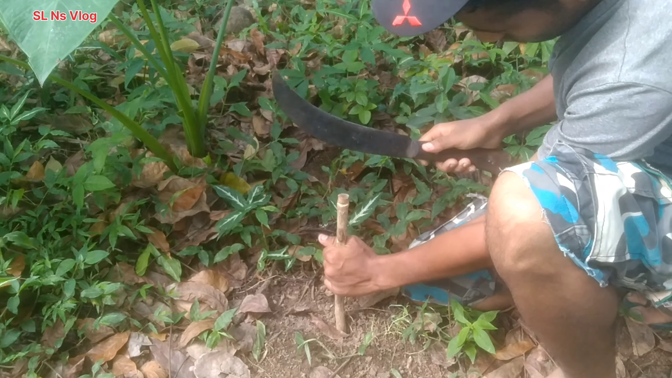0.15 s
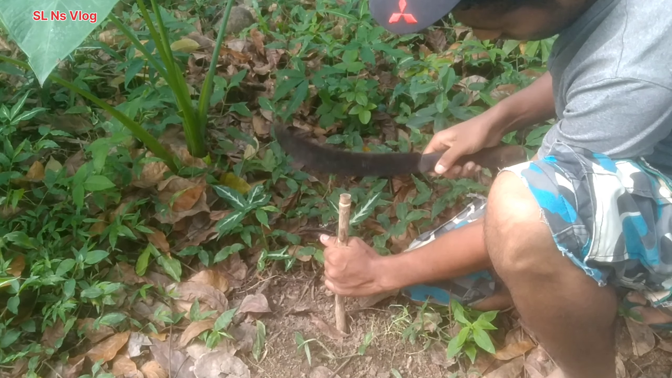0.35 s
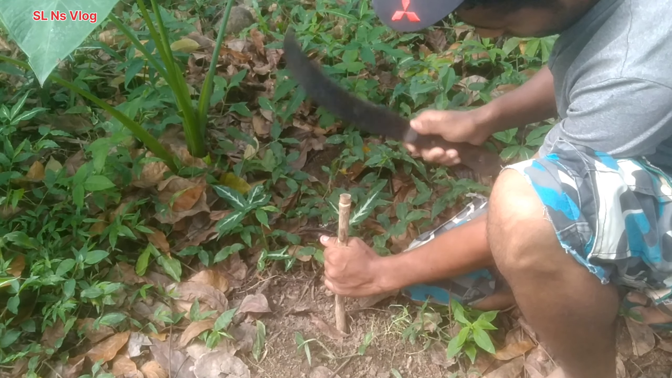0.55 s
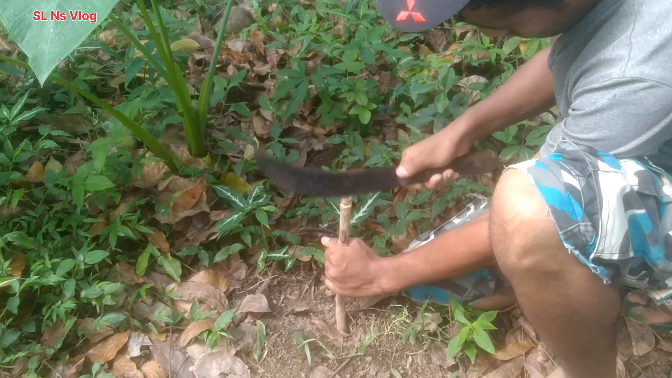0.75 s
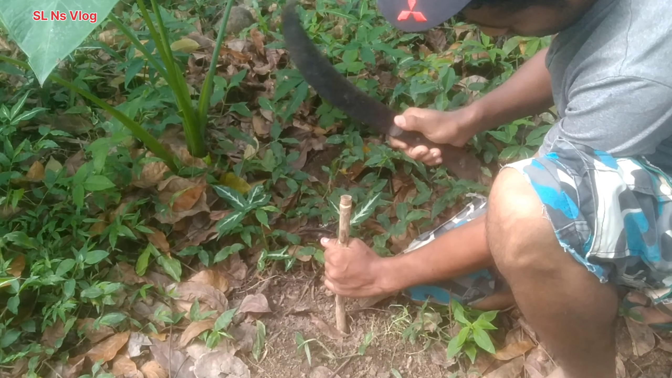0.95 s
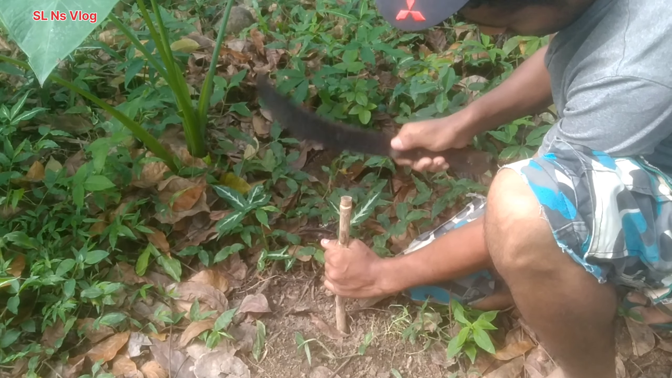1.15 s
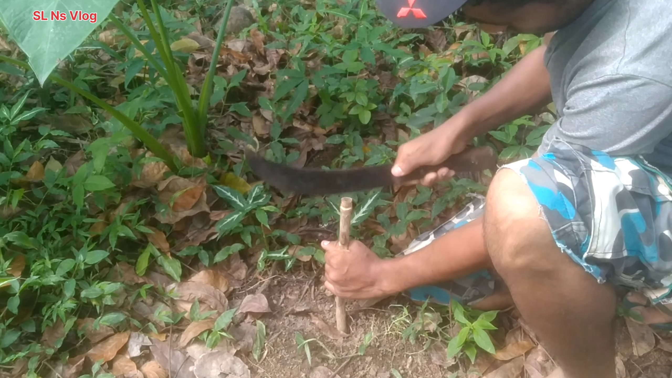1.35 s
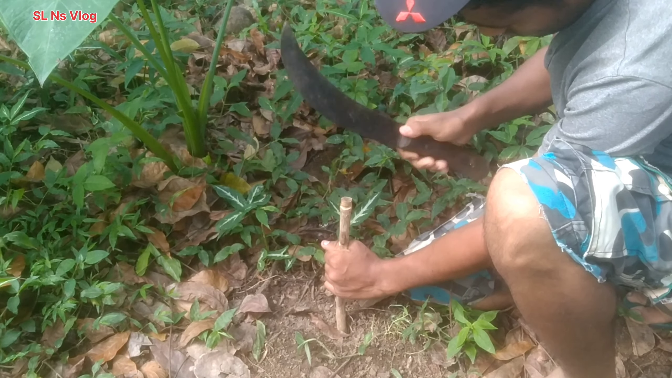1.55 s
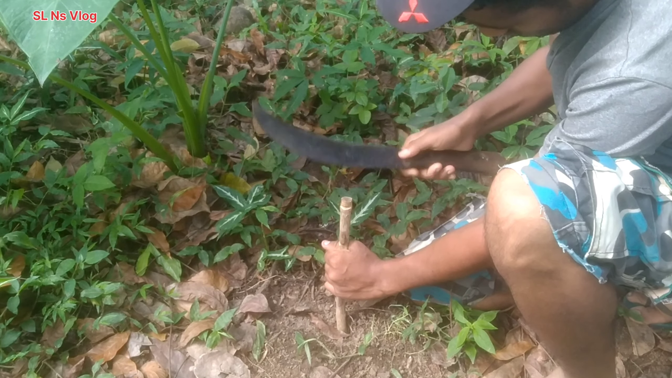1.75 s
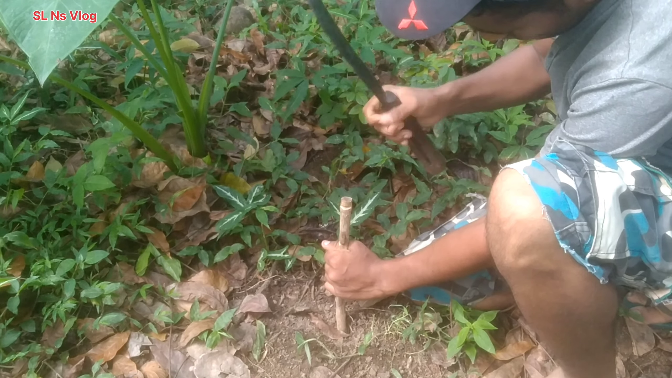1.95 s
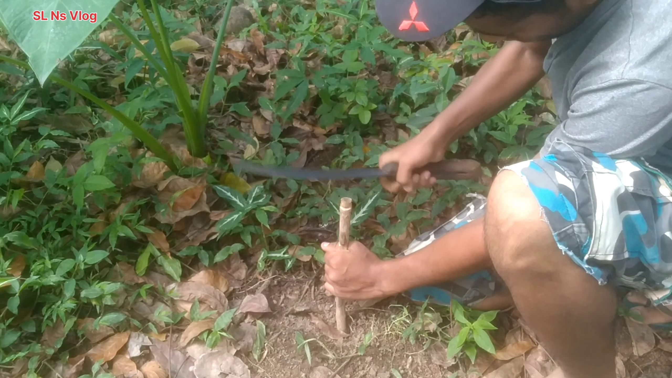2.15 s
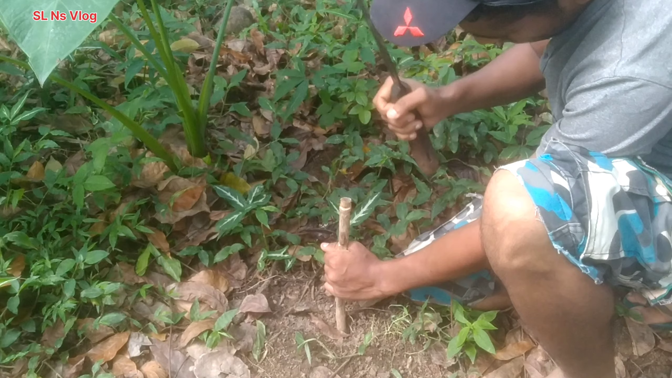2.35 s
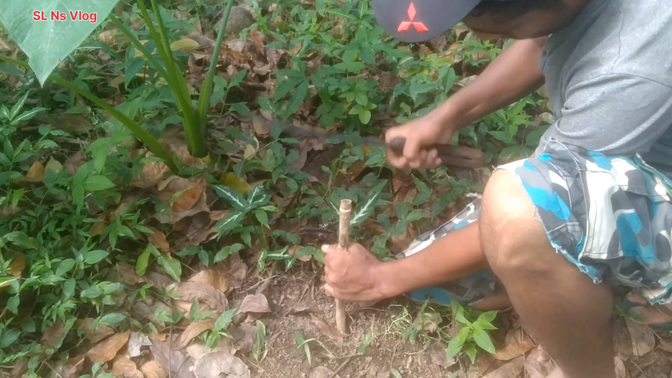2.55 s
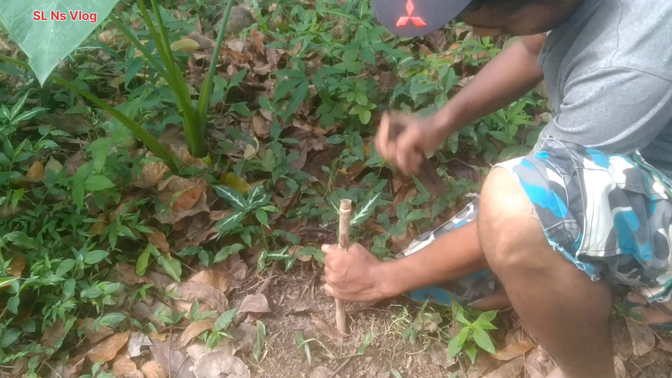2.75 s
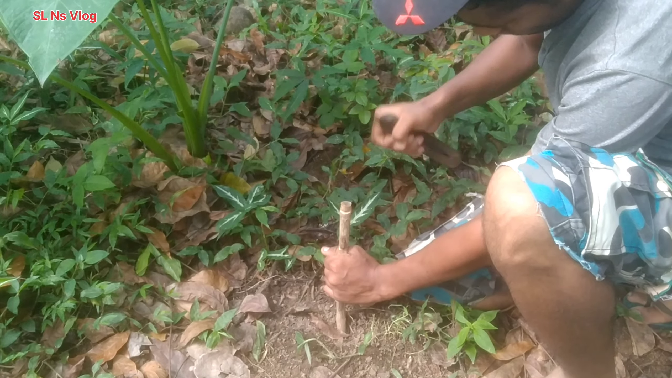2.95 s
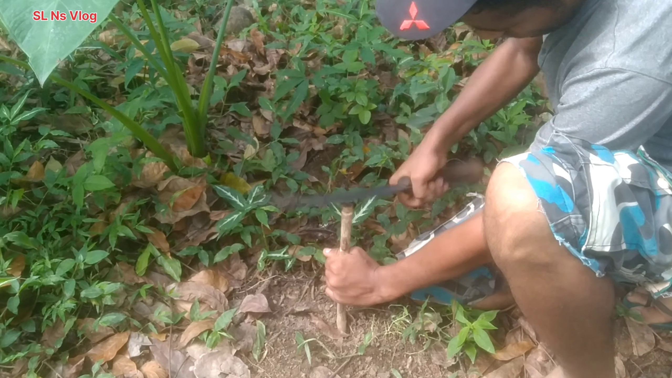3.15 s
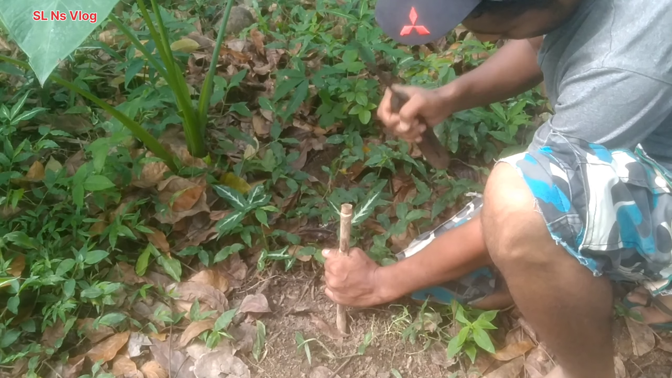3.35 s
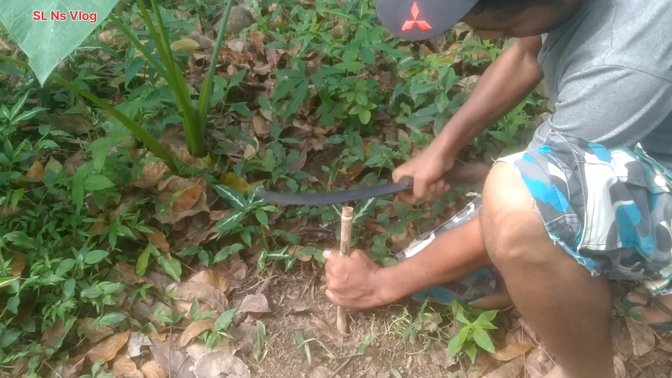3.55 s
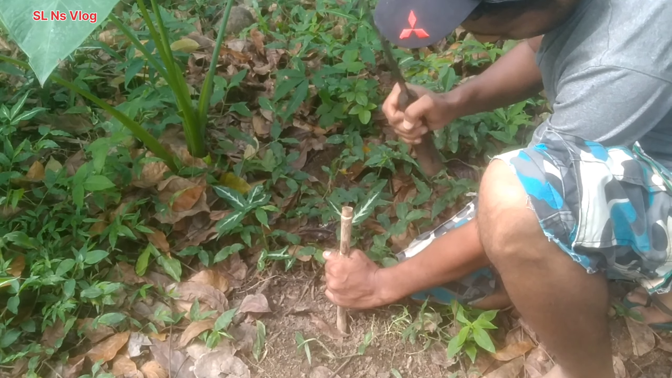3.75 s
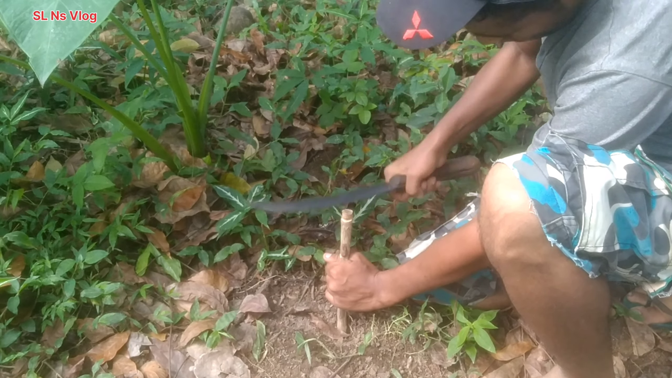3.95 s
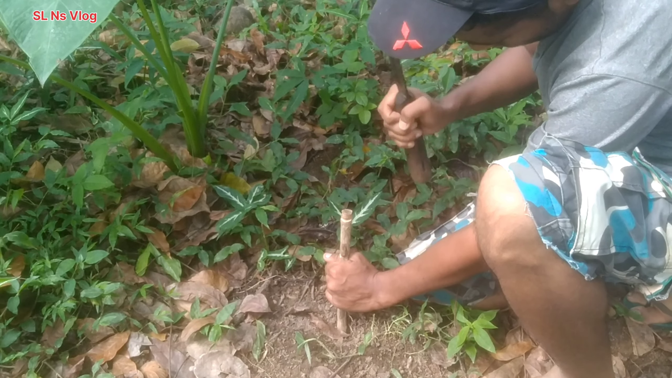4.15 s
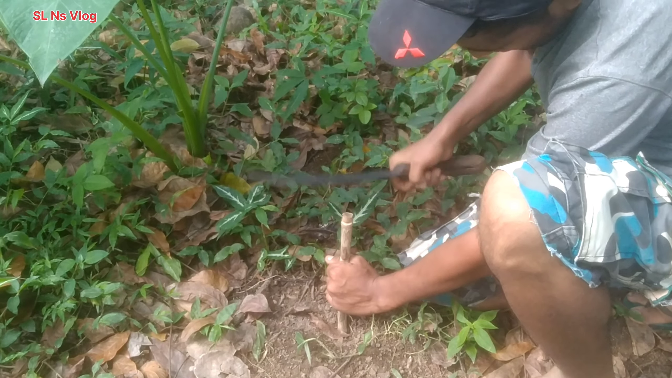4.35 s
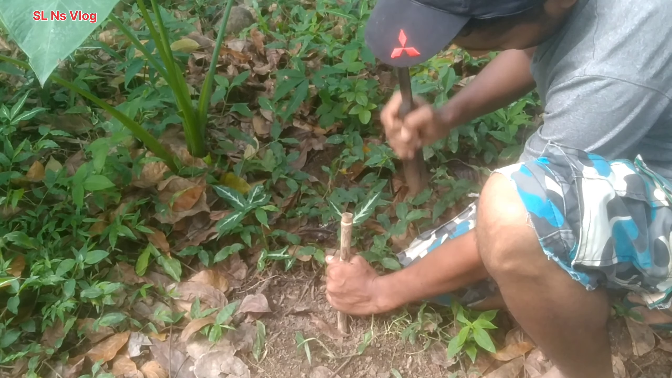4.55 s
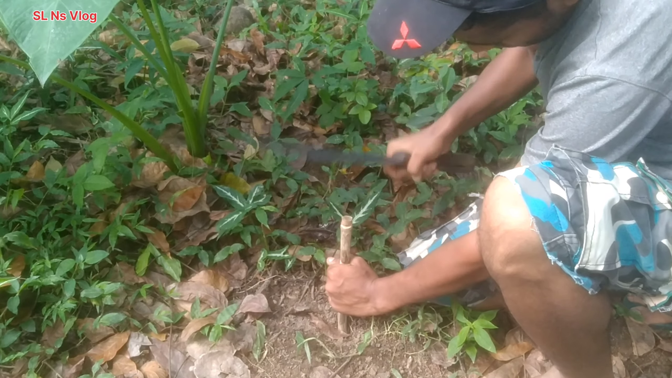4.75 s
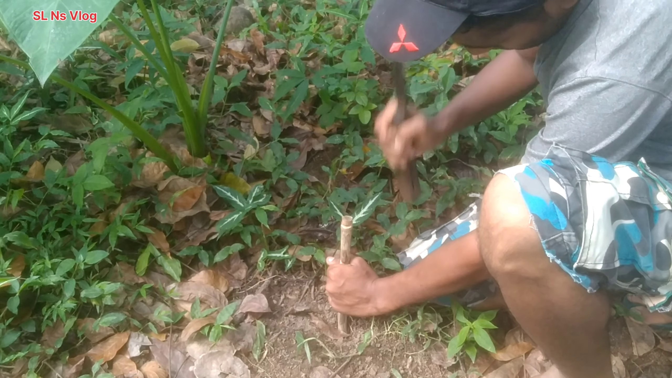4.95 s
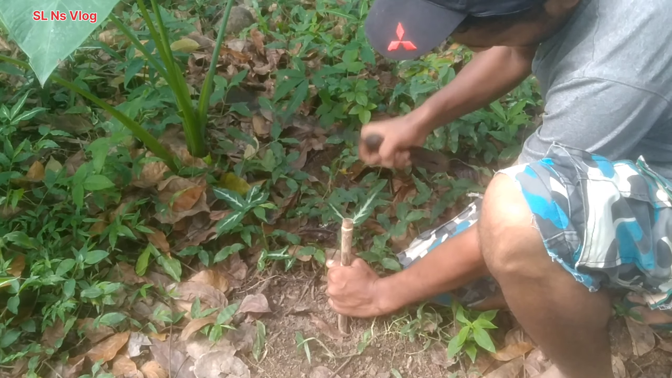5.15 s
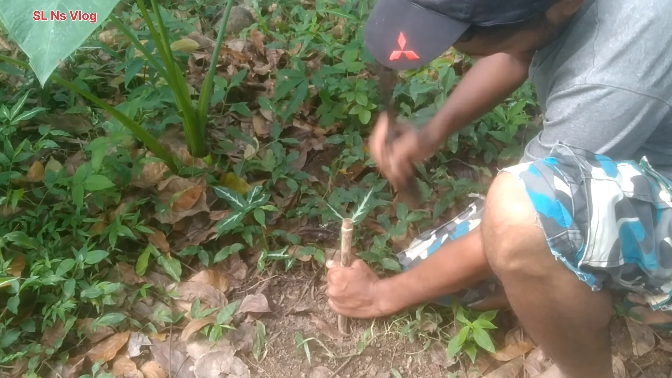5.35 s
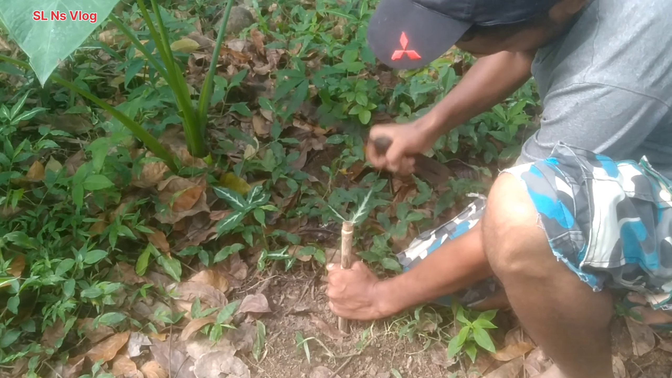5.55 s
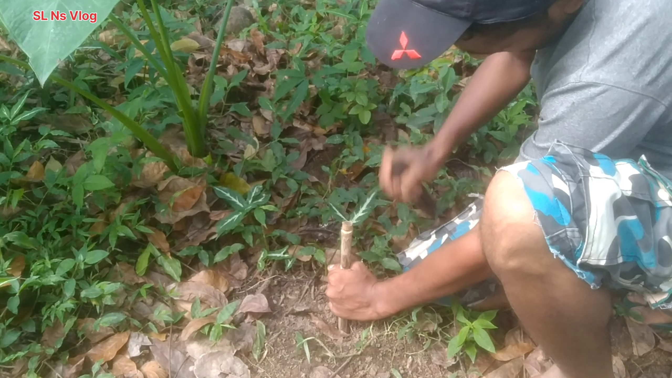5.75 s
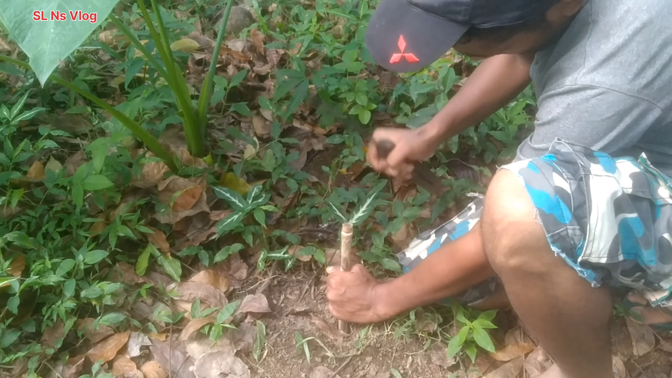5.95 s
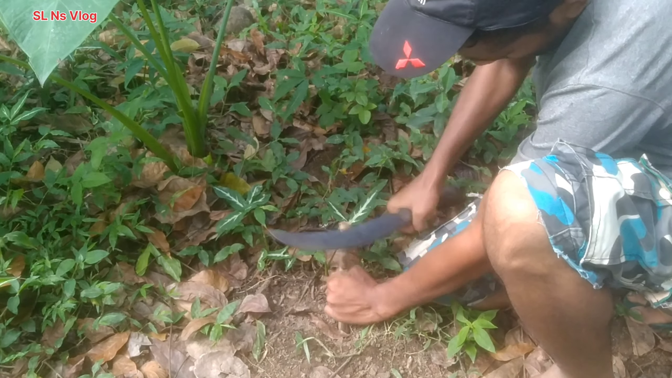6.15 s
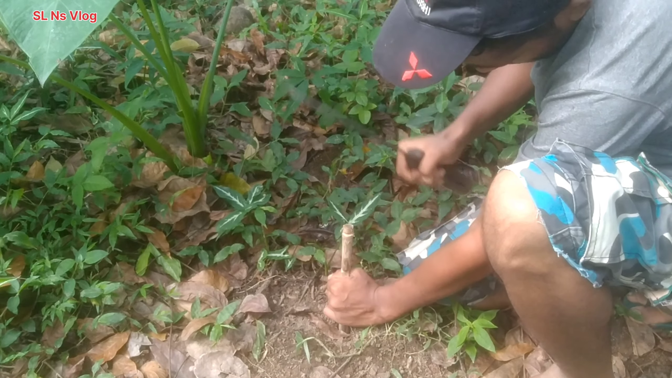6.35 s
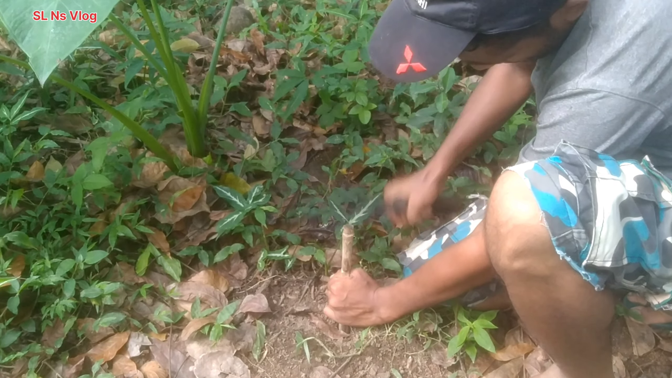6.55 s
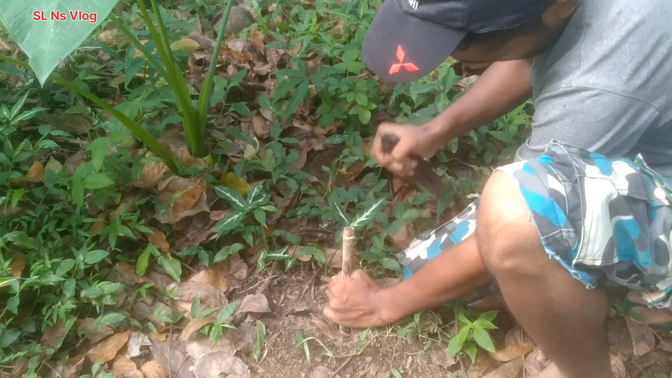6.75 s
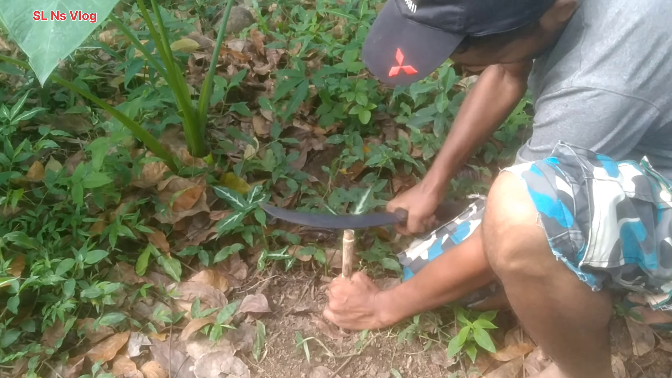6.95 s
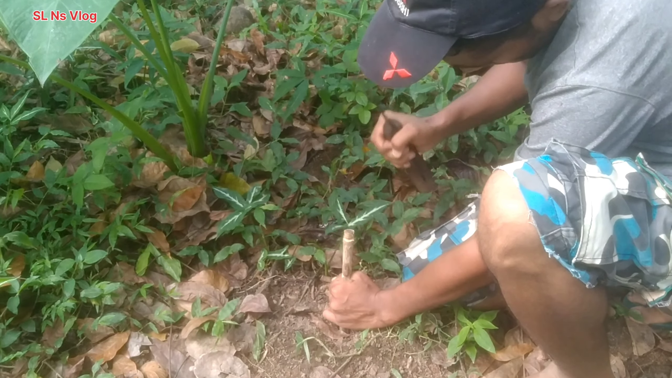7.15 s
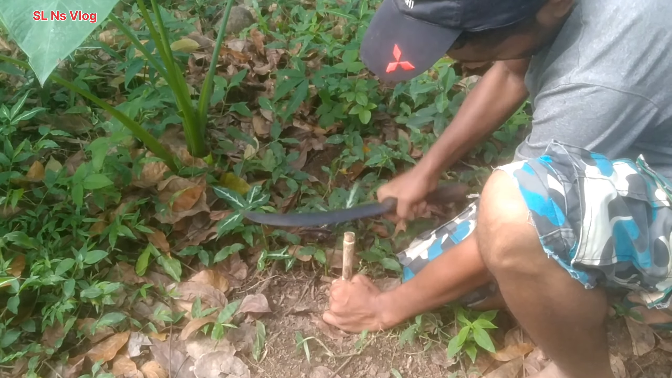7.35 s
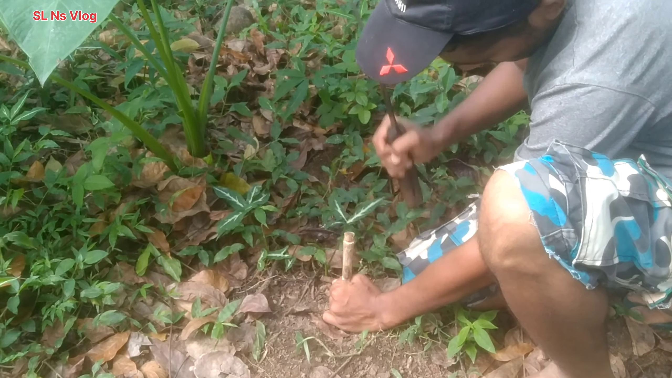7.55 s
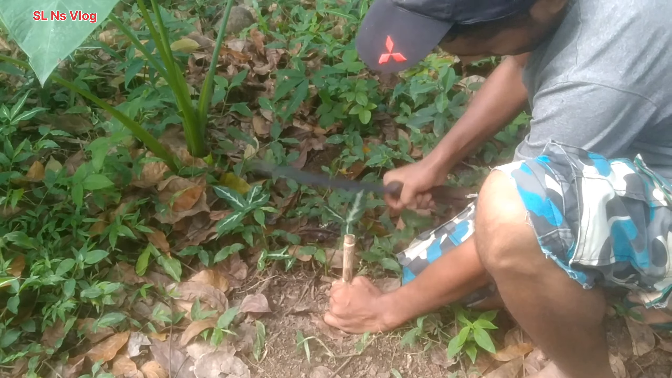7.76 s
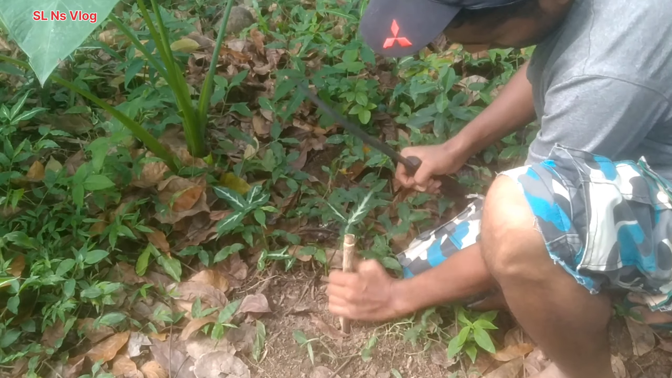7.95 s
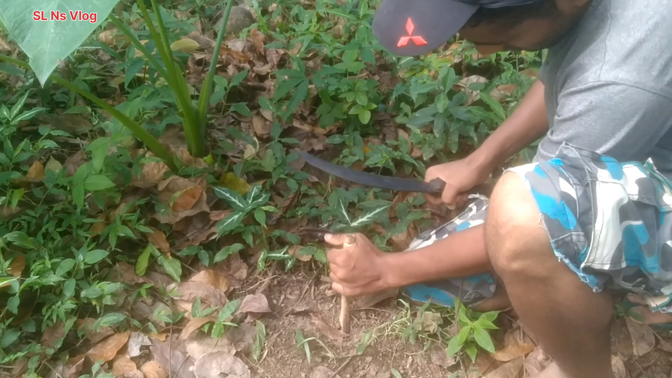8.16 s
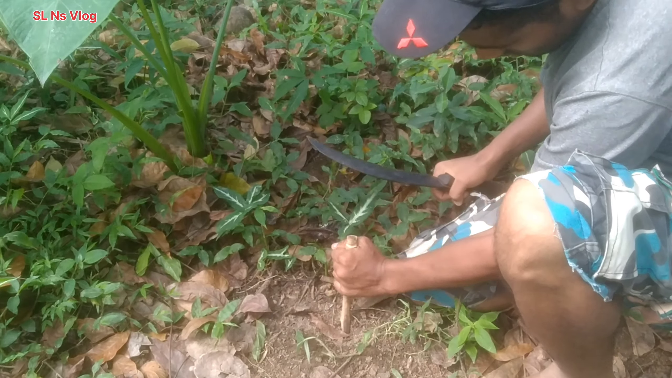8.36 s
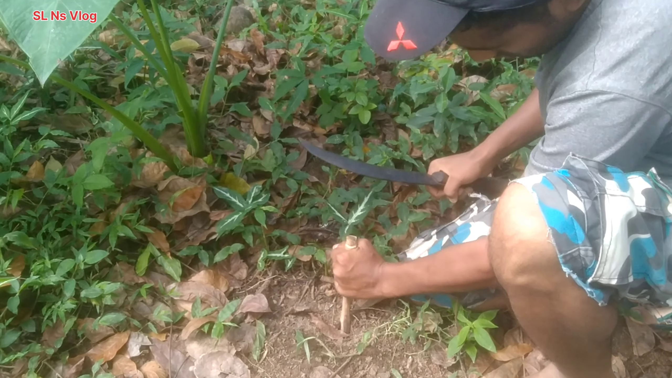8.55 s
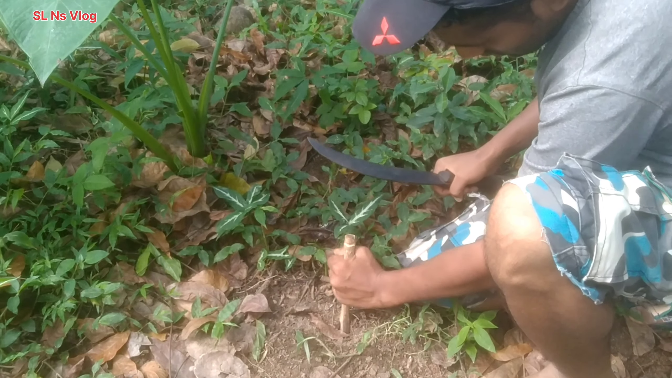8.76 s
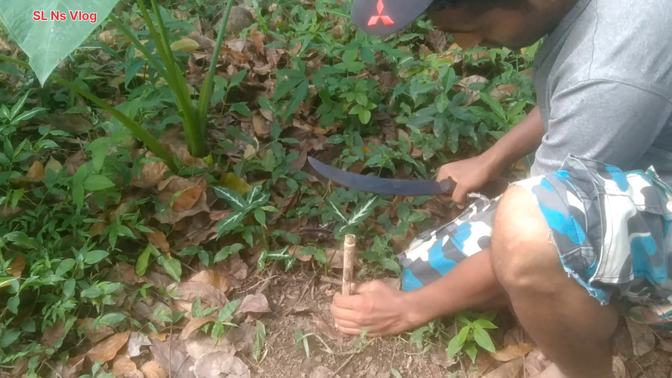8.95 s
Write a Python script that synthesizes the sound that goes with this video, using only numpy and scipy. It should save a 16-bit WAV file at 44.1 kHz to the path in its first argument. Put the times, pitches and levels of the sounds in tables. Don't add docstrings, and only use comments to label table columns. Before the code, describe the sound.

Three light machete taps on a thin wooden stake, then sixteen hard, sharp cracks driving it into soil, ringing among trees.

```python
import sys
import numpy as np
from scipy import signal
from scipy.fft import rfft, irfft
from scipy.io import wavfile
from scipy.ndimage import uniform_filter1d

SR = 44100
rng = np.random.default_rng(int(sys.argv[2]) if len(sys.argv) > 2 else 0)


def boost(x):
    u = np.asarray(x, float) / 20
    return 10 ** u


def wrap_up_sound(samples):
    columns = np.atleast_2d(samples).T
    tamed = np.clip(columns, -1, 1)
    steps = np.round(tamed * 32767).astype(np.int16)
    wavfile.write(sys.argv[1], SR, steps)


N = 400869

# start in seconds, peak in dB, scatter in dB, soil thud in dB.
TAPS = [
    (0.846, -25.5, -26, -42),
    (1.145, -31, -31.5, -37.5),
    (1.424, -28.5, -30, -39),
]
# landing in seconds, peak in dB, stake pitch in Hz, membrane push in dB, gain drop in dB.
BLOWS = [(2.1942, -24.5, 2310, -56, -1), (2.5565, -16, 2430, -45, 3.5), (2.8968, -13.5, 2430, -45, 4),
         (3.245, -16, 2515, -34, 8), (3.6042, -16, 2580, -43.5, 6), (3.971, -15.5, 2530, -44.5, 5.5),
         (4.3562, -16, 2710, -43.5, 8), (4.727, -14, 2710, -32, 11), (5.1124, -15.5, 2360, -41.5, 9),
         (5.497, -16, 2380, -34, 12.5), (5.8864, -17, 2440, -43, 8.5), (6.251, -13.5, 2500, -36.5, 8),
         (6.6652, -17.5, 2470, -48, 4.5), (7.0331, -15, 2390, -44, 7), (7.3863, -17.5, 2440, -42, 12.5),
         (7.7262, -16.5, 2410, -41, 6.5)]
# ring in dB, landing place along the blade 0-1, slant in dB.
BLADE = [(-62.5, .45, 9), (-68, .39, 5), (-61, 0.41, 9), (-46.5, 0, 0), (-31, 0.9, -6.5), (-51.5, 0.6, -12),
         (-43.5, 1, -1), (-37.5, .15, 2), (-39, .93, 0.5), (-47.5, 0, 0), (-45, 0.64, -0.5),
         (-45.5, 0.49, 0), (-32, .89, 0.5), (-39.5, 0.3, -7), (-39.5, .91, -2.5), (-27, 0.92, 0.2),
         (-37.5, .22, 2.5), (-34, .40, 1.5), (-37, 0.48, 2)]


def rms_one(x):
    return x / np.sqrt(np.mean(x ** 2) + 1e-20)


def peak_one(x):
    return x / np.max(np.abs(x))


def at_hz(points, hz, column=1):
    points = np.array(points)
    return np.interp(np.log(hz), np.log(points[:, 0]), points[:, column])


def along(rows):
    return boost(np.interp(np.arange(N) / SR, *np.transpose(rows)))


def bandpass(x, low_hz, high_hz, order=2):
    return signal.sosfilt(signal.butter(order, [low_hz, high_hz], "band", fs=SR, output="sos"), x)


def smooth(x, seconds):
    r = np.exp(-1 / (seconds * SR))
    return signal.lfilter([1 - r], [1, -r], x)


def add(out, s, sound):
    i = round(s * SR)
    out[i:i + len(sound)] += sound[:N - i]


def ring(force, hz, t60_s):
    r = boost(-60 / (t60_s * SR))
    w = 2 * np.pi * hz / SR
    return signal.lfilter([0, np.sin(w)], [1, -2 * r * np.cos(w), r * r], force + 1e-18)


def strike(force, modes):
    total = 0
    for k, (hz, db, t60_s) in enumerate(modes):
        energy_gain = np.sqrt(.15 * t60_s)
        total = total + (-1) ** k * boost(db) * rms_one(ring(force, hz, t60_s)) * energy_gain
    return total


def contact(length_s, graze_db):
    ground_echo_s = .0011
    t = np.arange(SR // 4) / SR - .003
    envelope = np.where(t < 0, boost(graze_db), np.exp(-np.maximum(t, 0) / length_s))
    force = envelope * rng.standard_normal(len(t))
    force[np.searchsorted(t, [0, ground_echo_s])] += [4.0, 3.0]
    return force


def air():
    # frequency in Hz, level in dB per Hz.
    spectrum = [(12, -37), (20, 3), (55, -7.5), (70, -10.5), (123, -22), (198, -22), (228, -35.5),
                (660, -28), (718, -27), (4180, -42.5), (6720, -54.5), (7950, -52), (16000, -52)]
    # time in seconds, level in dB.
    swell = [
        (0.0, -59.5),
        (2.0, -61),
        (2.43, -54.5),
        (4.58, -54.5),
        (4.76, -54.5),
        (7.09, -55),
        (7.8, -52),
        (8.48, -62.5),
        (9.09, -64),
    ]
    hz = np.maximum(np.arange(N // 2 + 1) * SR / N, 1)
    noise = rfft(rng.standard_normal(N)) * boost(at_hz(spectrum, hz))
    low = 1 / (1 + (hz / 200) ** 2)
    hiss = boost(-67) * irfft(noise * (1 - low), N) / np.std(irfft(noise, N))
    return hiss + boost(2.0) * along(swell) * rms_one(irfft(noise * low, N))


def insects():
    # centre in Hz, width in Hz, rms in dB.
    chorus = [(6870, 820, -82.5), (9900, 1900, -87.5), (14700, 2400, -90)]
    out = np.zeros(N)
    for hz, width_hz, db in chorus:
        out += boost(db) * rms_one(bandpass(rng.standard_normal(N), hz - width_hz / 2, hz + width_hz / 2))
    return out


def ticks():
    # start in seconds, peak in dB, lowest frequency in Hz.
    snaps = [(0.222, -81.5, 2200), (0.667, -83.5, 2200), (1.342, -85, 6500), (3.128, -75, 11000),
             (3.44, -69, 9000), (7.335, -72, 12100), (7.372, -70, 13000), (5.785, -74, 13000),
             (8.03, -81, 12500), (8.089, -82.0, 13000), (8.115, -80, 9000), (8.385, -85, 7000),
             (8.994, -81, 2200)]
    out, t = np.zeros(N), np.arange(SR // 50) / SR
    for s, peak_db, low_hz in snaps:
        sos = signal.butter(2, low_hz, "high", fs=SR, output="sos")
        snap = signal.sosfilt(sos, rng.standard_normal(len(t)))
        add(out, s, boost(peak_db + 16.0) * snap * np.exp(-t / 0.009))
    return out


def taps():
    # mode in Hz, level in dB, t60 in seconds.
    stake_modes = [(945, -22.0, .075), (1676, -19.0, .075), (330, -5.0, .012), (650, -5.0, .006),
                   (1330, -7.0, .006), (1950, -6.0, .006), (2450, -4.0, .007), (3300, -2.0, .006),
                   (4100, -6.0, .006), (5600, -16.0, .004), (7900, -20.0, .003), (10200, -22.0, .003),
                   (15600, -14.0, .004)]
    # mode in Hz, level in dB, t60 in seconds.
    sent_modes = [(1650, -2.5, .012), (2330, 1.5, 0.0078), (3357, -3, 0.0054), (6000, -11.5, 0.0025),
                  (9000, -17, 0.0014)]
    out, click = np.zeros((2, N)), signal.unit_impulse(SR // 4)
    for (s, peak_db, scatter_db, thud_db), (*_, slant_db) in zip(TAPS, BLADE):
        modes = [(hz, db + slant_db * (hz > 5000), t60_s) for hz, db, t60_s in stake_modes]
        sent = [(hz, db + slant_db * (hz > 5000), t60_s) for hz, db, t60_s in sent_modes]
        wood = peak_one(strike(contact(length_s=0.0029, graze_db=-41.0), modes))
        thud = ring(smooth(click, .0003), 185, .022)
        add(out[0], s - .0035, boost(peak_db + 8.0) * wood)
        add(out[0], s + .0017, -boost(thud_db + 11.0) * thud)
        add(out[1], s, boost(scatter_db) * strike(click, sent))
    return out


def steel():
    # tone in Hz, partner in Hz.
    tones = [(12062, 12093), (13672, 13700), (15040, 15074)]
    tone_t60_s = [0.16, 0.16, .09]
    half_waves, free_end = (2, 3, 4), .25
    at_node = 0.03
    clang_db, clang_t60_s = -7.5, 0.021
    out, click = np.zeros(N), signal.unit_impulse(SR // 2)
    times_s = [row[0] for row in TAPS + BLOWS]
    grips = rng.uniform(-1, 1, (len(BLADE), 3, 2))
    for s, (ring_db, place, _), grip in zip(times_s, BLADE, grips):
        for (hz, partner_hz), t60_s, waves, (share, shift) in zip(tones, tone_t60_s, half_waves, grip):
            bend = abs(np.sin(np.pi * (waves * place + free_end))) + at_node
            main = ring(click, hz + 14 * shift, t60_s)
            partner = (share + np.sign(share)) / 2 * ring(click, partner_hz + 16 * share, t60_s)
            clang = ring(click, hz - 60 * share, clang_t60_s) + ring(click, hz + 90 * shift, clang_t60_s)
            add(out, s + .001, boost(ring_db + 13.0) * bend * (main + partner + boost(clang_db) * clang))
    return out


def trees(x):
    # frequency in Hz, near level in dB, near t60 in seconds, far level in dB, far t60 in seconds.
    echo_bands = [(506, -42, .06, -37.5, 0.82), (833.3, -22.5, 0.041, -47, 1.0),
                  (2360, -37, 0.089, -48.5, 0.8), (4400, -33.5, 0.089, -43.5, 0.65),
                  (7705, -28, 0.098, -40.5, 0.69), (10780, -38.5, .08, -47.5, 0.61),
                  (15000, -39.5, .08, -39.5, .5)]
    t = np.arange(SR) / SR
    edges_hz = 150 * 2 ** np.arange(0, 7.1, .5)
    starts = [round(row[0] * SR) - 200 for row in TAPS + BLOWS]
    white, echoes, out = rng.standard_normal((2, 2 * SR)), 0, np.zeros(N)
    for k, (low_hz, high_hz) in enumerate(zip(edges_hz, edges_hz[1:])):
        band = bandpass(white[k % 2], low_hz, high_hz)
        centre_hz = np.sqrt(low_hz * high_hz)
        near_db, near_t60_s, far_db, far_t60_s = (at_hz(echo_bands, centre_hz, c) for c in range(1, 5))
        fade = boost(near_db - 60 * t / near_t60_s) + boost(far_db - 60 * t / far_t60_s)
        echoes = echoes + fade * [band[2000 * j:][:SR] for j in range(len(starts))]
    echoes = echoes * np.clip(t / 0.0029, 0, 1)
    for start, end, echo in zip(starts, starts[1:] + [N], echoes):
        add(out, start / SR, signal.fftconvolve(x[start:end], echo))
    return out


def blows():
    # mode in Hz, level in dB, t60 in seconds.
    wood_modes = [(945, -7.0, .022), (1364, -6.0, .009), (1790, -1.0, .01), (3300, -1.0, .005)]
    # mode in Hz, level in dB, t60 in seconds.
    treble_modes = [(3690, 6.5, 0.0034), (5110, 11, 0.00096), (6540, 5.5, 0.0026), (8040, 3.5, 0.0026),
                    (10000, -3, 0.0034), (12280, 0, 0.0023), (14790, -2, 0.009), (15000, 5.5, 0.00061)]
    # dB of a square grip re stake pitch, share of the slant
    square_grip_db, slant_share = (-11.5, -1.5, -4, 1.12, -5), (0.92, -.09, .6, 0.13, 0.12)
    out, click = np.zeros((2, N)), signal.unit_impulse(SR // 4)
    for (s, peak_db, stake_hz, _, drop_db), (*_, slant_db) in zip(BLOWS, BLADE[len(TAPS):]):
        grip_db = np.add(square_grip_db, np.multiply(slant_share, slant_db))
        modes = [(hz, db + mode_db, t60_s) for (hz, db, t60_s), mode_db in zip(wood_modes, grip_db)]
        modes.insert(3, (stake_hz, 0, .008))
        modes += [(hz, db + grip_db[-1], t60_s) for hz, db, t60_s in treble_modes]
        force = contact(length_s=.0012, graze_db=-22 + 0.06 * (stake_hz - 2500))
        scatter_db = -12.5 + 0.32 * (peak_db + 16.5) + 0.36 * (drop_db - 6.5)
        add(out[0], s - .003, boost(peak_db + 11.0) * peak_one(strike(force, modes)))
        add(out[1], s, boost(scatter_db) * (strike(click, modes) + boost(-12.5) * click))
    return out


def membrane():
    out, t = np.zeros(N), np.arange(SR // 2) / SR
    push = 0.2473 * np.exp(-t / 0.053) - 1.683 * np.exp(-t / 0.006) + .45 * np.exp(-t / 0.0014)
    push = smooth(push, 0.000043)
    for s, _, _, push_db, _ in BLOWS:
        add(out, s + 0.00039, boost(push_db + 27.5) * push)
    return out


def hum():
    # mode in Hz, level in dB, t60 in seconds.
    bending_modes = [(505, -73, .9), (796, -71, .8), (1050, -74.5, 0.51), (1250, -71.5, 1),
                     (1690, -72.5, 0.86)]
    out, luck = 0, rng.normal(0, 4.0, (len(BLOWS), len(bending_modes)))
    for (hz, db, t60_s), luck_db in zip(bending_modes, luck.T):
        clicks = np.zeros(N)
        clicks[[round(blow[0] * SR) for blow in BLOWS]] = boost(db + luck_db)
        out = out + ring(clicks, hz, t60_s)
    return out


def rustle():
    # time in seconds, level in dB.
    brush = [
        (7.9, -100.0),
        (8.02, -78),
        (8.185, -68),
        (8.21, -81),
        (8.6, -96.0),
        (9.09, -105.0),
    ]
    bark_modes = [(980, -5.0, .012), (1950, 0.0, .016), (3150, -7.0, .012),
                  (5500, 4.0, .001), (13000, 6.0, .0007)]
    return along(brush) * rms_one(strike(rng.standard_normal(N), bark_modes))


def scene():
    direct, sent = taps() + blows()
    blade = steel()
    slap = boost(-21.0) * np.roll(direct, round(.011 * SR))
    scattered = trees(sent + boost(-9) * blade)
    strikes = direct + slap + blade + scattered + membrane() + hum()
    mono = strikes + air() + insects() + ticks() + rustle()
    return np.array([mono, mono])


def gain_control():
    look_ahead_s, hold_s = .005, .0845
    grid_s, grid_start_s = .02341, .0172
    duck_db = np.zeros(N)
    for s, *_, drop_db in BLOWS:
        back_s = grid_start_s + grid_s * np.ceil((s + hold_s - grid_start_s) / grid_s)
        duck_db[round((s - look_ahead_s) * SR):round(back_s * SR)] = -drop_db
    return boost(smooth(duck_db, .0006))


def top_cut(x):
    top = signal.sosfiltfilt(signal.butter(4, 15900, "high", fs=SR, output="sos"), x)
    loud = uniform_filter1d(top ** 2, size=128) > boost(-50.0) ** 2
    body, wide = (signal.sosfiltfilt(signal.ellip(8, .2, 45, cutoff_hz, fs=SR, output="sos"), x)
                  for cutoff_hz in (15700, 16850))
    opening = uniform_filter1d(uniform_filter1d(1. * loud, size=128), size=128)
    return body + (wide - body) * opening


def noise_patches(x):
    side, white = 0, rng.standard_normal(N)
    for low_hz in np.arange(4200, 15000, 1300):
        level = np.sqrt(smooth(bandpass(x, low_hz, low_hz + 1300, order=4) ** 2, .012))
        noise = rms_one(bandpass(white, low_hz, low_hz + 1300, order=4))
        on = np.repeat(rng.random(N // 3072 + 1) < .2, 3072)[:N]
        side = side + level * smooth(on, .004) * noise
    return boost(-14.5) * side * [[1], [-1]]


def band_limit(x):
    return signal.sosfilt(signal.butter(12, 17130, fs=SR, output="sos"), x)


def record(dry):
    x = top_cut(dry[0] * gain_control())
    return band_limit(x + noise_patches(x))


dry = scene()
out = record(dry)
wrap_up_sound(out)
```